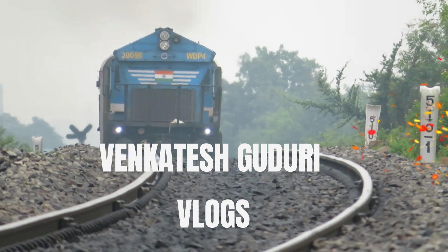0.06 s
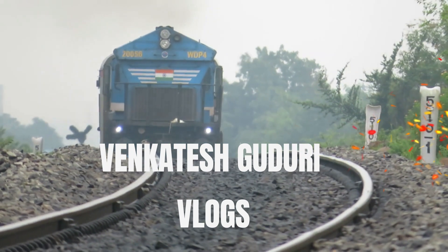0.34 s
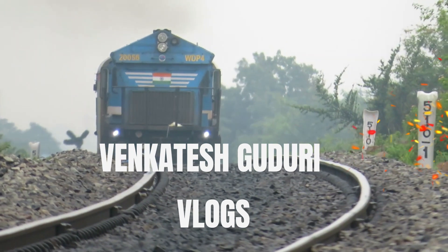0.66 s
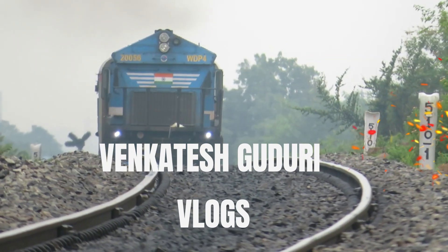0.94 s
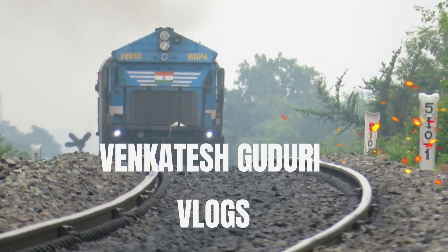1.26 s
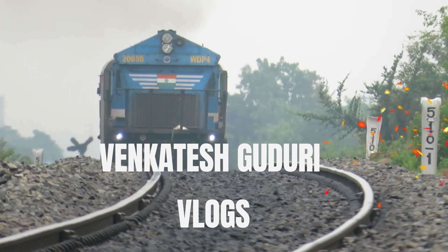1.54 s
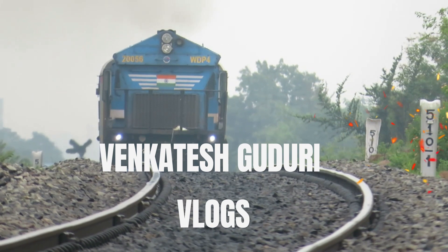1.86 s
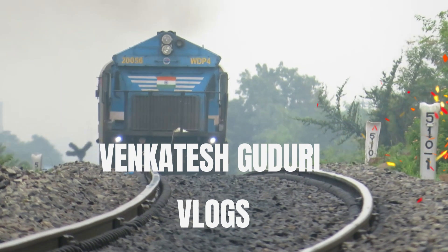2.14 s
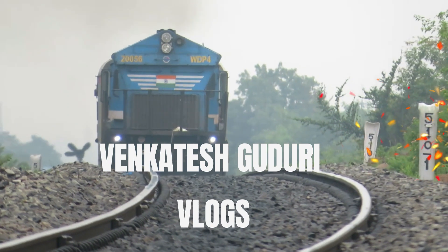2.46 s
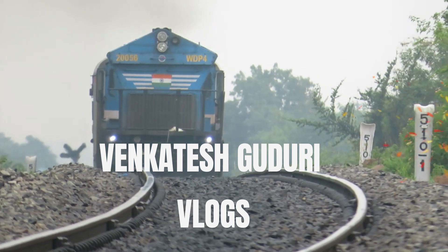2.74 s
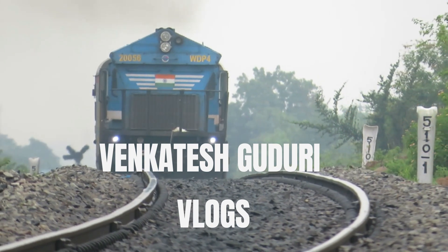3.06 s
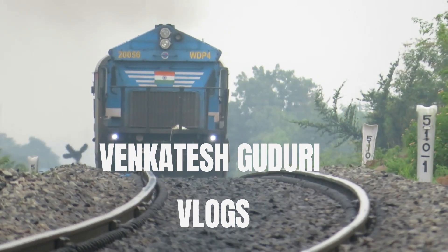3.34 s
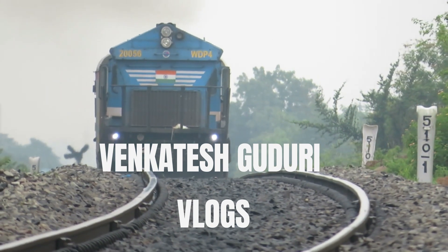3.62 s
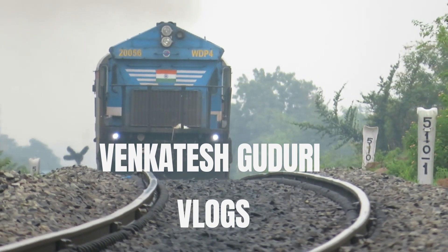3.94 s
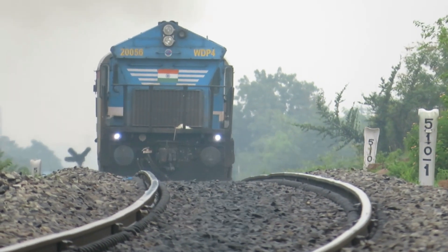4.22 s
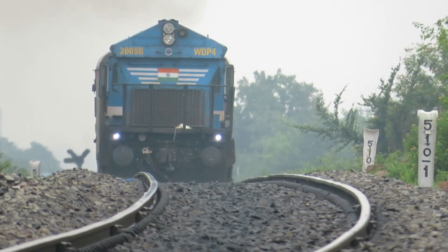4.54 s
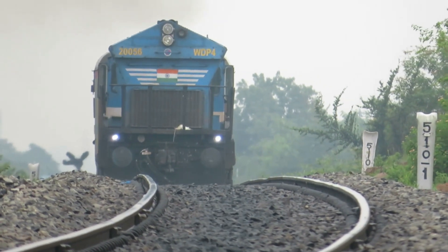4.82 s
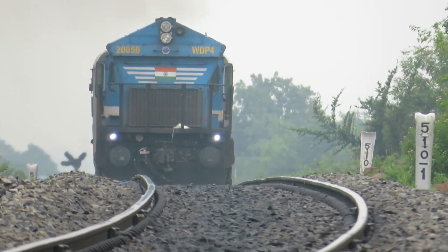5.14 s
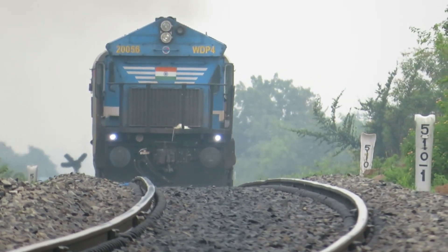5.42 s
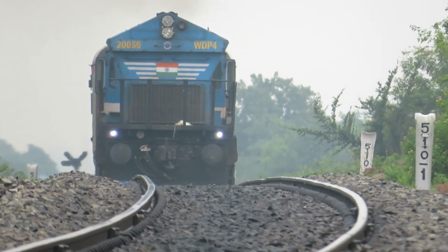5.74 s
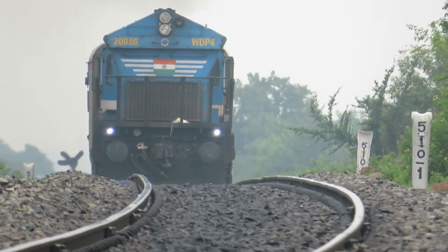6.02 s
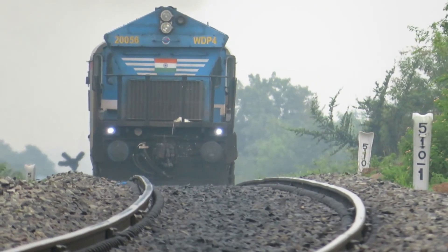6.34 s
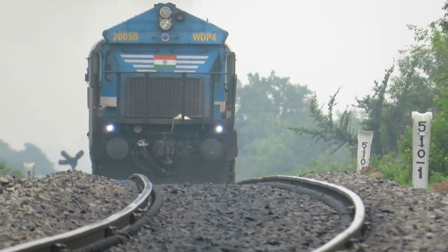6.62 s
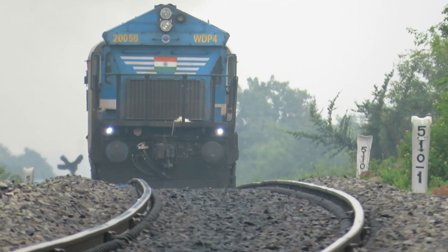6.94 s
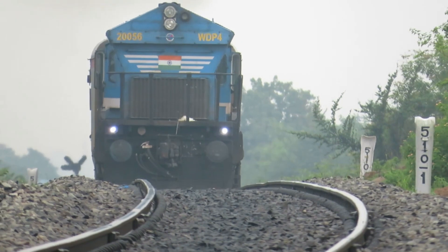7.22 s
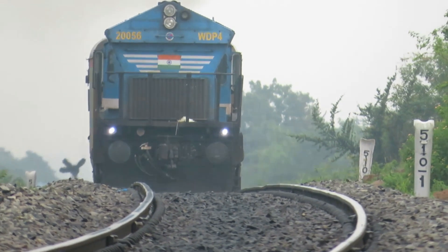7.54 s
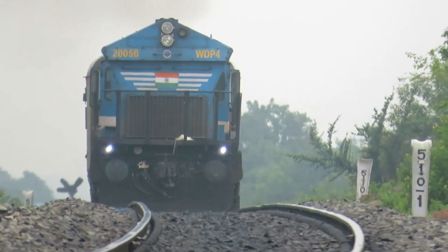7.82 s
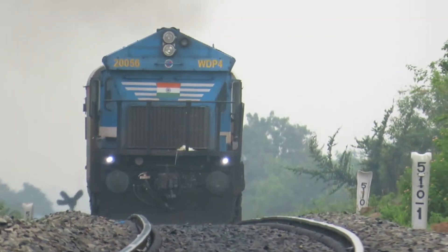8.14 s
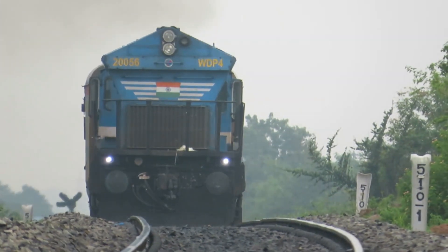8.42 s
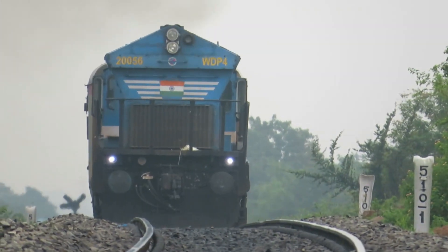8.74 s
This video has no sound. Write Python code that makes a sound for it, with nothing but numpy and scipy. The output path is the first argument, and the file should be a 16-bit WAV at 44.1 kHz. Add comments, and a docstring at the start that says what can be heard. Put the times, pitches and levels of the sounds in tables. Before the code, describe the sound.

The deep, pulsing hum of a slowly approaching diesel train outdoors, with one brief spit of air and faint bird chirps.

```python
"""Open country: a two-stroke diesel locomotive creeps round a curve towards the listener.
Its cylinders fire at a steady engine speed, so the exhaust throbs in harmonics of the crank.
Fans and blowers hum, gears whine, the running gear clanks once; gas, air and rolling wheels are
bands of noise. An air valve spits once. Small birds whistle and an insect buzzes in the bushes."""
import sys
import numpy as np
from scipy import signal
from scipy.fft import rfft, irfft, next_fast_len
from scipy.io import wavfile

SR = 44100
rng = np.random.default_rng(int(sys.argv[2]) if len(sys.argv) > 2 else 0)


def pcm_store(signal):
    """Save signal as 16-bit PCM."""
    levels = np.round(np.clip(np.atleast_2d(signal), -1, 1) * 32767)
    wavfile.write(sys.argv[1], SR, levels.astype(np.int16).T)


N = 396018


def from_db(db):
    return 10 ** (np.asarray(db) / 20)


def rms_one(x):
    return x / np.sqrt(np.mean(x ** 2) + 1e-20)


def seconds():
    return np.arange(N) / SR


def in_time(rows):
    """Rows of (time_s, values...) as one automation curve per value."""
    times, *columns = np.transpose(rows)
    return [np.interp(seconds(), times, column) for column in columns]


def gain_at(points, hz):
    """Rows of (freq_hz, gain_db) as an EQ curve, joined on a log axis."""
    freq_hz, gain_db = np.transpose(points)
    return from_db(np.interp(np.log(hz + 1), np.log(freq_hz), gain_db))


def drift(rate_hz):
    """A smooth random wobble of rms 1."""
    hop, run_in = 100, 2000
    pole = np.exp(-2 * np.pi * rate_hz * hop / SR)
    noise = rng.standard_normal(N // hop + run_in + 2)
    slow = signal.lfilter([1], [1, -2 * pole, pole * pole], noise)[run_in:]
    return np.interp(np.arange(N) / hop, np.arange(len(slow)), rms_one(slow))


def air_noise(colour):
    """Stereo turbulence of rms 1 in one colour, rolled off beyond its ends."""
    # stereo width: freq_hz, side_minus_mid_db
    spread = [(30, -33), (90, -21), (160, -15.5), (300, -10), (700, -15), (1400, -15.5), (2800, -11),
              (5000, -7.5), (9000, -5), (11000, -35)]
    size = next_fast_len(N, True)
    hz = np.arange(size // 2 + 1) * SR / size
    high_cut = 1 / (1 + (hz / (1.2 * colour[-1][0])) ** 8)
    low_cut = 1 / (1 + (colour[0][0] / (hz + 1)) ** 4)
    mid, side = rfft(rng.standard_normal((2, size))) * gain_at(colour, hz) * high_cut * low_cut
    side = side * gain_at(spread, hz)
    return rms_one(irfft(np.array([mid + side, mid - side]), size)[:, :N])


def shimmering(level_db, colour, shimmer_db=0.74):
    """Coloured noise whose level flickers a little."""
    return from_db(level_db + shimmer_db * drift(5.3)) * air_noise(colour)


def hum(hz, width_hz, evenness=0.44):
    """Turbulence rings in one narrow resonance; evenness compresses its swings in level."""
    sway = drift(width_hz) + 1j * drift(width_hz)
    ringing = np.real(sway * np.exp(2j * np.pi * hz * seconds()))
    return rms_one(ringing / (np.abs(sway) + 0.18) ** evenness)


def bushes(dry, t60_s=0.5, tail_db=-5, bank_s=.021, bank_db=-11):
    """The ballast bank throws back one echo; leaves and trunks scatter a short stereo tail."""
    t = np.arange(SR // 2) / SR
    tail = rng.standard_normal((2, len(t))) * from_db(-60 * t / t60_s)
    tail = from_db(tail_db) * tail / np.sqrt(np.sum(tail ** 2, axis=1, keepdims=True))
    tail[:, int(bank_s * SR)] += from_db(bank_db)
    return dry + signal.fftconvolve(dry[None], tail, axes=1)[:, :N]


def insect(pitch_hz=5700, width_hz=260, pulses_per_s=3.1, level_db=-72.0):
    """A faint, thin buzz that comes in pulses."""
    pulse = np.sin(np.pi * (pulses_per_s * seconds() + 0.26 * drift(0.84))) ** 2
    return from_db(level_db) * pulse * hum(pitch_hz, width_hz, evenness=0)


def bird_notes(rise_hz_per_s=10000, whistle_s=.048, pip_hz=4300, pip_s=0.021, pip_after_s=.112):
    """The birds' score, as rows of start_s, length_s, pitches_hz, level_db."""
    # rising slurs: start_s, length_s, start_hz, level_db
    slurs = [(0.563, .095, 4480, -55.3), (.682, .064, 4720, -56), (5.635, 0.065, 4050, -60),
             (5.701, 0.072, 4650, -52.5), (5.775, 0.035, 4330, -60), (5.815, .062, 4770, -57.5)]
    # quick falling chips: start_s, length_s, start_hz, end_hz, level_db
    chips = [(2.895, .02, 5000, 4100, -57.5), (3.213, 0.026, 4550, 3300, -52),
             (5.485, 0.028, 3450, 2770, -54), (5.49, .022, 6650, 6000, -60),
             (5.519, 0.033, 4100, 3200, -50.3), (5.526, 0.024, 5700, 5050, -56.5),
             (5.579, .022, 4050, 3450, -55), (5.608, 0.022, 5300, 4900, -59),
             (5.935, .035, 5270, 4950, -59), (7.86, .02, 5000, 3520, -59), (8.14, .026, 6400, 3450, -59.5),
             (8.399, 0.038, 6400, 2600, -58.5), (8.45, 0.026, 2600, 2100, -53)]
    # two-note calls, an arching whistle and then a low pip: start_s, level_db
    calls = [(2.933, -52), (3.254, -52.2)]
    whistle_hz = (6000, 6560, 6250, 5650, 4550)
    climb = np.array([0, .62, 1])  # share of a slur's rise at its start, middle and end
    notes = []
    for start_s, length_s, start_hz, db in slurs:
        notes.append((start_s, length_s, start_hz + rise_hz_per_s * length_s * climb, db))
    for start_s, length_s, start_hz, end_hz, db in chips:
        notes.append((start_s, length_s, (start_hz, np.sqrt(start_hz * end_hz), end_hz), db))
    for start_s, db in calls:
        notes.append((start_s, whistle_s, whistle_hz, db))
        notes.append((start_s + pip_after_s, pip_s, (pip_hz,) * 3, db - 0.5))
    return notes


def birds(warble=.011, rasp_db=2.6, edge_s=.006):
    """Each note is a slightly raspy sine that bends through its pitches, swelling early and fading."""
    out = np.zeros(N)
    unsteady = 1 + warble * drift(150)
    for start_s, length_s, pitches_hz, level_db in bird_notes():
        progress = np.linspace(0, 1, int(length_s * SR))
        start = int(start_s * SR)
        span = slice(start, start + len(progress))
        bend = np.polyfit(np.linspace(0, 1, len(pitches_hz)), pitches_hz, len(pitches_hz) - 1)
        hz = np.polyval(bend, progress) * unsteady[span]
        edges = np.minimum(np.minimum(progress, 1 - progress) * length_s / edge_s, 1)
        swell = edges * (1 + np.sin(np.pi * np.sqrt(progress))) / 2
        out[span] += from_db(level_db) * swell * np.sin(2 * np.pi * np.cumsum(hz) / SR)
    return out * from_db(rasp_db * drift(90))


def noise_bed(rumble_db=-34.0, hiss_db=-60.5):
    """A steady low rumble under a faint, steady hiss."""
    # colours of the two bands: freq_hz, gain_db
    rumble = [(15, -33), (25, -19), (38, -4), (50, -1.5), (69, 6.5), (84, 6), (105, 1), (135, -2),
              (170, -7), (230, -13), (330, -35.5)]
    hiss = [(1800, -3.5), (3000, -2.5), (3600, -1), (4100, -2), (4500, -3.5), (5700, -7), (6300, -7),
            (7000, -11), (8500, -13.5), (10000, -16.5), (12500, -20), (15600, -26.5)]
    return from_db(rumble_db) * air_noise(rumble) + from_db(hiss_db) * air_noise(hiss)


def flank_hiss(facing, level_db=-69, head_on_db=-13):
    """A thin hiss from the locomotive's flank, hidden when it is head-on."""
    # narrow treble band: freq_hz, gain_db
    colour = [(3600, -20), (4200, -1), (4900, 0), (5700, -5.5), (6500, -13)]
    return shimmering(level_db + head_on_db * facing, colour)


def turbocharger():
    """The turbocharger hisses in the upper mids."""
    # its swell: time_s, level_db
    level = [(0, -57.5), (2, -56.5), (2.9, -55.5), (4.5, -57), (6, -57), (8.98, -59)]
    # its colour: freq_hz, gain_db
    colour = [(1700, -29.5), (2100, -1.5), (2400, 2.5), (2650, 0.5), (2950, -7), (3300, -7), (3700, -8.5),
              (4100, -9.5), (4500, -18.5)]
    return shimmering(in_time(level)[0], colour)


def wheels():
    """Wheels rolling on the rails make a midrange wash."""
    # its swell: time_s, level_db
    level = [(0, -46), (2.2, -48), (6.1, -49.5), (8.98, -46.5)]
    # its colour: freq_hz, gain_db
    colour = [(550, -27), (800, -1), (1000, 0.5), (1170, -2), (1400, -2.5), (1650, -3.5), (2050, -8.5),
              (2500, -18), (3000, -25), (6000, -50)]
    return shimmering(in_time(level)[0], colour)


def air_valve(start_s=3.76, level_db=-53.3, attack_s=0.018, hold_s=0.077, fall_db_per_s=32):
    """One spit of compressed air: the valve opens, holds and lets go."""
    # bright, peaky air jet: freq_hz, gain_db
    colour = [(1800, -15), (2500, 14), (3100, 2), (3900, 5), (4600, -2), (6300, -9), (8500, -14),
              (10000, -25), (14000, -33)]
    age = seconds() - start_s
    opening = np.clip(age / attack_s, 0, 1)
    released_s = np.maximum(age - attack_s - hold_s, 0)
    return opening * from_db(level_db - fall_db_per_s * released_s) * air_noise(colour)


def clank(start_s=3.602, level_db=-38.5):
    """One dull knock sets a heavy part of the running gear ringing briefly."""
    # the part's modes: pitch_hz, gain_db, t60_s
    modes = [(885, -1, 0.11), (1070, -4, .09), (686, 1, .1), (1790, -13, .06)]
    age = np.maximum(seconds() - start_s, 0)
    return sum(from_db(level_db + gain_db - 60 * age / t60_s) * np.sin(2 * np.pi * pitch_hz * age)
               for pitch_hz, gain_db, t60_s in modes)


def gear_whine(wander=0.00505, flutter_db=2.0):
    """The drive gears whine a little higher as the train gathers speed."""
    # gear tone: time_s, pitch_hz, level_db
    whine = [(0, 420, -70.5), (4.5, 427, -60), (5.6, 428, -56), (6.4, 431, -53), (7.3, 434, -50.5),
             (7.8, 435, -61.5)]
    pitch_hz, level_db = in_time(whine)
    phase = 2 * np.pi * np.cumsum(pitch_hz * (1 + wander * drift(6))) / SR
    return np.sqrt(2) * from_db(level_db + flutter_db * drift(6.1)) * np.sin(phase)


def machine_hums():
    """Tones of blowers, gears and wheels each swell once and fade as the locomotive turns."""
    # resonances: pitch_hz, width_hz, level_db, loudest_s, half_length_s
    hums = [(64.3, 3.6, -42, 1.9, 1.2), (95, 1.14, -34.5, 7.3, 6.1), (111.9, 2.5, -41, 2.1, 3.1),
            (195.2, 1.2, -46.5, 1.5, 4.5), (151.8, 1.3, -51.5, 5.6, 2.6), (271.3, 3, -49, 2.2, 1.2),
            (321, 18, -58, 6.3, 1.4), (280, 18, -53, 4.7, 1.3), (165.5, 21, -48, 0.6, 0.62),
            (347, 25, -52.5, 0.6, 0.97), (636.5, 11, -56.5, 2.2, 2.1), (673, 23, -53, 2.3, 0.42),
            (847, 9, -54.5, 0.73, 1.2), (761, 140, -56.5, 4.45, .35), (927, 220, -55, 3.5, 0.37),
            (1230, 45, -55, 8.15, 0.25), (1094, 300, -55, 8.45, .5), (1080, 100, -49.5, 8.7, 0.14),
            (990, 10, -63.5, 5.8, 1.6), (1401, 32, -61, 5.4, 1.1), (1385, 20, -58, 8.75, .2)]
    out = 0
    for pitch_hz, width_hz, level_db, loudest_s, half_length_s in hums:
        swell = np.exp(-.5 * ((seconds() - loudest_s) / half_length_s) ** 2)
        out = out + from_db(level_db) * swell * hum(pitch_hz, width_hz)
    return out


def fan_air(facing, level_db=-48.5, head_on_db=-3):
    """Fan air rushes from the roof; head-on, the cab shields it."""
    # midrange rush: freq_hz, gain_db
    colour = [(300, -25), (450, 3.5), (550, -1), (700, -0.5), (850, -4.5), (1200, -19.5)]
    return shimmering(level_db + head_on_db * facing, colour)


def cooling_fan(blade_hz=210.66, wander=0.003, flutter_db=2.2, blade_trim_db=-0.6, octave_trim_db=-1.5):
    """The blade note and its octave flutter in the moving air."""
    # swells of the two tones, before trim: time_s, level_db
    blade_level = [(0.0, -38.5), (0.35, -36), (0.65, -43), (1.1, -43.5), (1.6, -50), (2.4, -36), (2.8, -39),
                   (3.05, -51), (3.8, -39.5), (4.6, -43.5), (6.2, -39), (7, -43.5), (8.1, -40.5),
                   (9.0, -42)]
    octave_level = [(0.0, -55), (1.0, -52), (2.8, -46), (3.4, -52), (3.6, -60), (5.0, -54.5), (9.0, -53.5)]
    phase = 2 * np.pi * np.cumsum(blade_hz * (1 + wander * drift(2.63))) / SR
    blade = from_db(in_time(blade_level)[0] + blade_trim_db + flutter_db * drift(5.7))
    octave = from_db(in_time(octave_level)[0] + octave_trim_db + flutter_db * drift(5.1))
    return np.sqrt(2) * (blade * np.sin(phase) + octave * np.sin(2 * phase))


def exhaust_gas():
    """Escaping gas rushes in the low mids."""
    # its swell: time_s, level_db
    level = [(0, -42), (1, -44.5), (1.7, -42.5), (3.4, -43), (4.1, -45), (4.8, -46.5), (7.3, -45.5),
             (8.98, -46)]
    # its colour: freq_hz, gain_db
    colour = [(130, -31), (200, 0.5), (260, -0.5), (320, -3.5), (355, -7.5), (400, -4), (470, -14.5),
              (650, -19.5)]
    return shimmering(in_time(level)[0], colour)


def exhaust_throb(facing, crank_hz=12.505, firing_order=8, waver_db=1.5,
                  hunt_turns=0.006, scatter_cycles=0.027, odd_lag_cycles=.135):
    """Unequal cylinders put crank harmonics round the firing note; the even ones chug twice a turn."""
    # firing note of one cylinder bank, and the next harmonic up: time_s, level_db
    firing = [(0.0, -33.5), (0.35, -35.5), (0.85, -42), (1.3, -41.5), (2.15, -29.5), (2.95, -34),
              (3.25, -24.5), (4.25, -33), (4.8, -26), (5.3, -29.5), (5.95, -26.5), (6.5, -26.5),
              (6.9, -30.5), (7.8, -29), (8.2, -25.5), (8.6, -29), (9.0, -37.5)]
    above_firing = [(0, -43.5), (5.1, -47.5), (5.6, -51), (6, -39), (6.9, -37), (7.3, -42.5), (7.75, -30.5),
                    (9, -43.5)]
    # the other harmonics: crank_multiple, level_db, head_on_change_db
    orders = [(4, -57, 3.5), (5, -42.5, 0), (6, -40, 5), (7, -42, -0.5), (10, -44, 5.5), (11, -60, -2),
              (12, -58.5, -2), (18, -61.5, 6), (20, -62, 6)]
    crank_turns = crank_hz * seconds() + hunt_turns * drift(0.51)

    def harmonic(multiple, level_db):
        cycles = multiple * crank_turns - odd_lag_cycles * (multiple % 2) + scatter_cycles * drift(0.93)
        return np.sqrt(2) * from_db(level_db) * np.cos(2 * np.pi * cycles)

    out = harmonic(firing_order, in_time(firing)[0])
    out += harmonic(firing_order + 1, in_time(above_firing)[0])
    for multiple, level_db, head_on_db in orders:
        out += harmonic(multiple, level_db + head_on_db * facing + waver_db * drift(0.78))
    return out


def scene():
    """The locomotive nearly straight ahead, small life beside the track."""
    # how squarely it faces the listener round the curve: time_s, head_on (0 to 1)
    heading = [(0, 0), (2.7, 0.07), (4.5, 0.9), (6.0, 0.95), (8.98, 0.27)]
    facing, = in_time(heading)
    tones = exhaust_throb(facing) + cooling_fan() + machine_hums() + gear_whine() + clank()
    noises = noise_bed() + exhaust_gas() + turbocharger() + wheels()
    noises += fan_air(facing) + flank_hiss(facing)
    slightly_right = from_db([[-.2], [.2]])
    return tones * slightly_right + noises + air_valve() + bushes(birds() + insect())


def record(dry, fade_s=.004, cutoff_hz=15650):
    """Quick fades at both ends and a steep high cut."""
    fade = np.clip(np.minimum(seconds(), seconds()[::-1]) / fade_s, 0, 1)
    high_cut = signal.ellip(10, .1, 80, cutoff_hz, fs=SR, output="sos")
    return signal.sosfilt(high_cut, dry * fade)


dry = scene()
out = record(dry)
pcm_store(out)
```